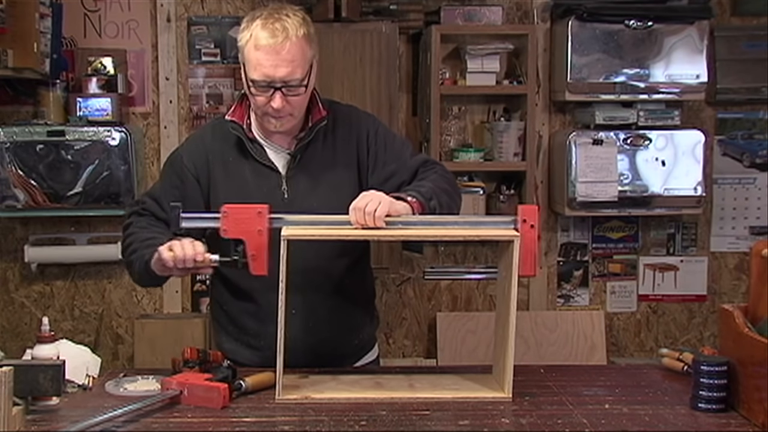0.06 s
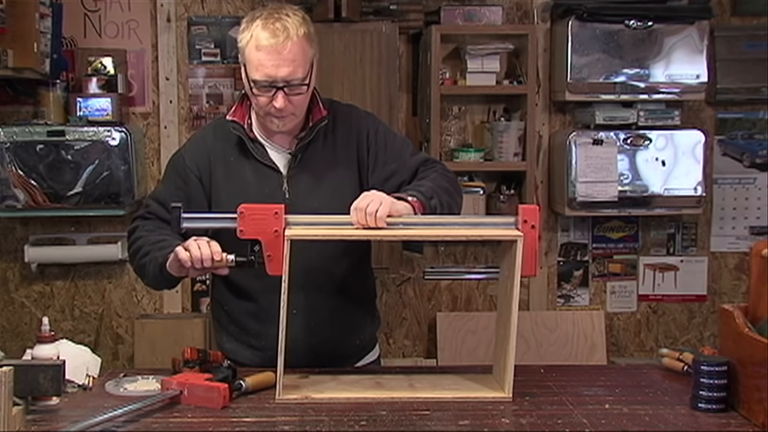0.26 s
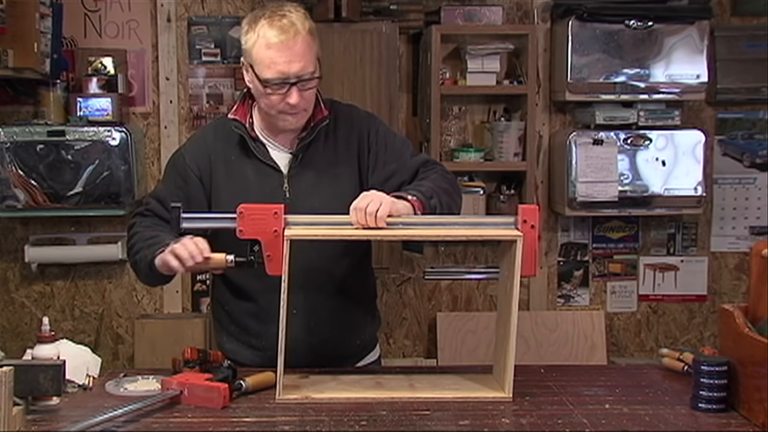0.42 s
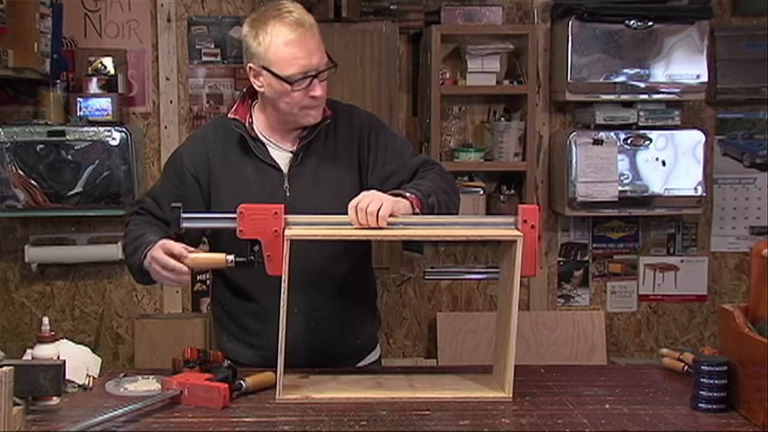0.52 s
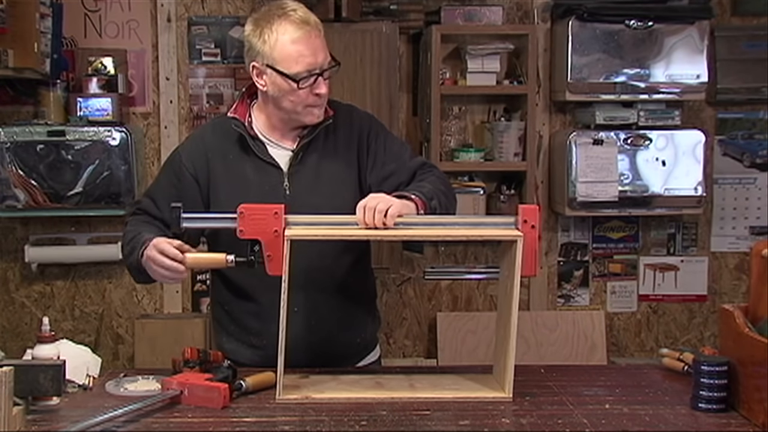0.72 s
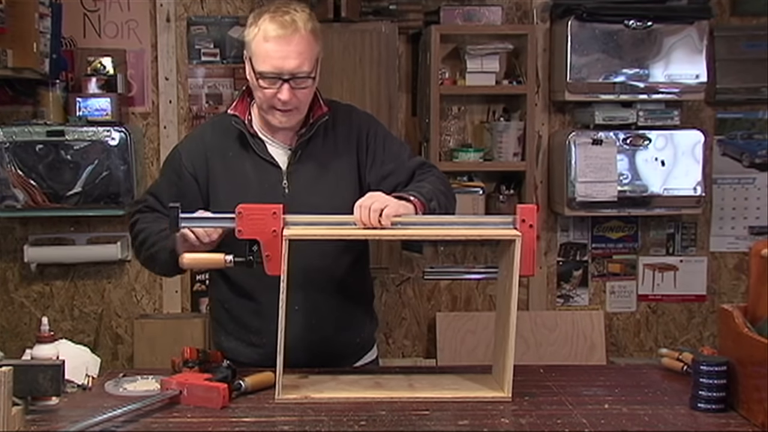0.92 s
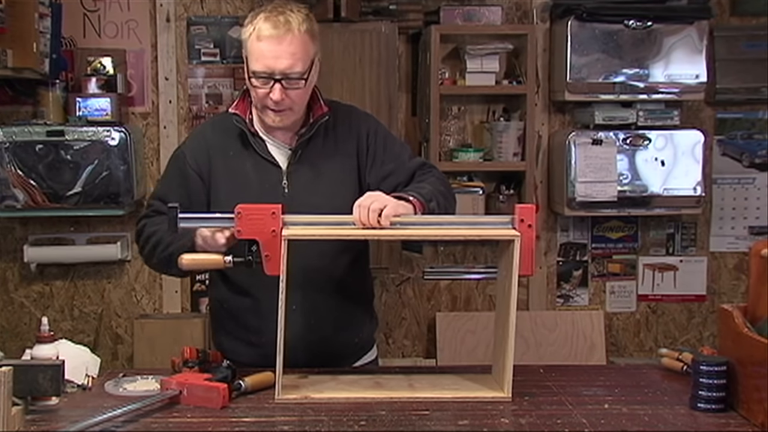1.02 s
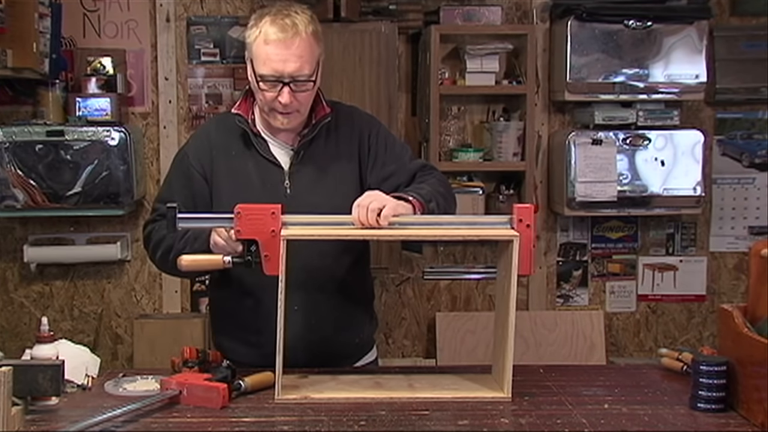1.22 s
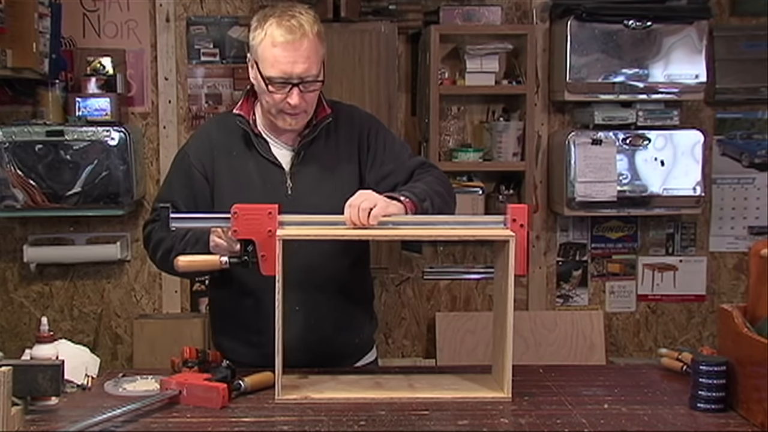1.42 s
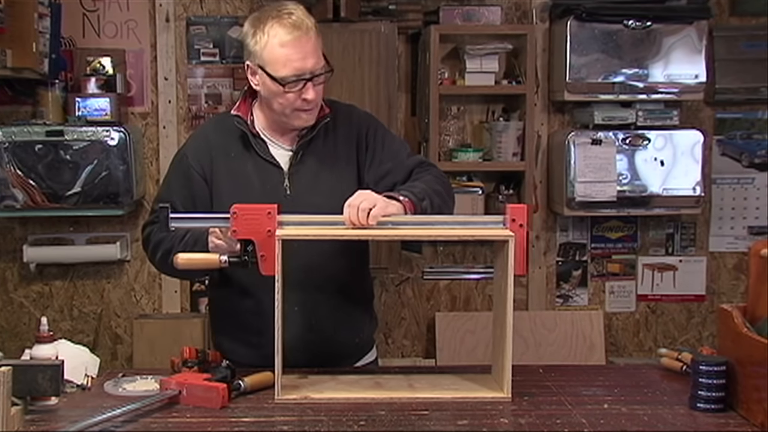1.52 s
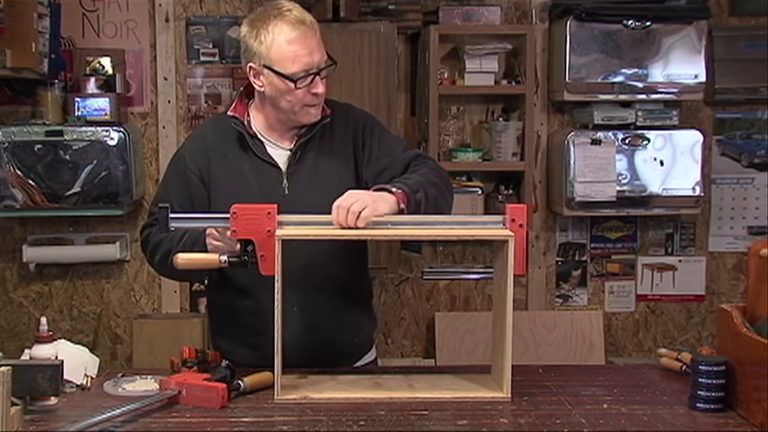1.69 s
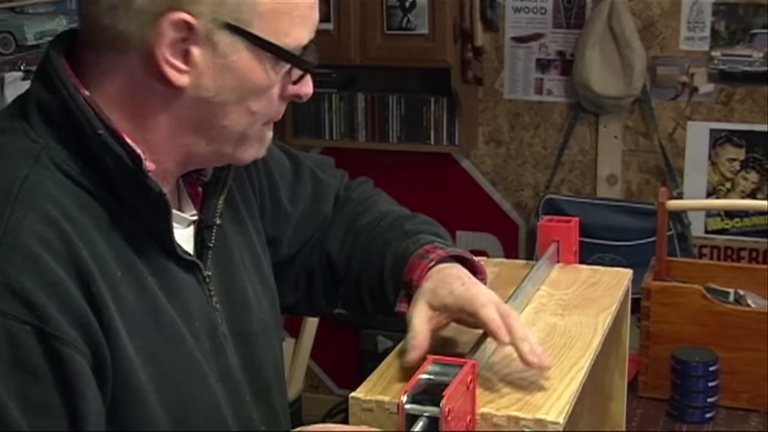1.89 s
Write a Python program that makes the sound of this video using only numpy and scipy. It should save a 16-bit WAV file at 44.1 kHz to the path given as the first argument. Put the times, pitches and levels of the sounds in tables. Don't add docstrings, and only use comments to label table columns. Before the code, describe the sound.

A metal bar clamp jaw scrapes briefly and slams on a hollow wooden box, then faint handle clicks and creaks, a second woody knock and a tiny squeak, close up in a quiet garage workshop.

```python
import sys
import numpy as np
from scipy import signal
from scipy.fft import rfft, irfft, next_fast_len
from scipy.io import wavfile

SR = 44100
rng = np.random.default_rng(int(sys.argv[2]) if len(sys.argv) > 2 else 0)


def wrap_up_sound(samples):
    columns = np.atleast_2d(samples).T
    tamed = np.clip(columns, -1, 1)
    steps = np.round(tamed * 32767).astype(np.int16)
    wavfile.write(sys.argv[1], SR, steps)


def gain_from_db(level_db):
    decades = np.asarray(level_db, float) / 20
    return 10 ** decades


N = 85995

# (frequency [Hz], width [Hz], level [dB])
HANDLE_MODES = [(1557, 51, -1), (1936, 54.8, 1.5), (2360, 103, -7.5), (2980, 70, -0.5), (3400, 110, -15.5),
                (4250, 350, -13)]


def unit(x):
    return x / np.sqrt(np.mean(x ** 2) + 1e-20)


def along(points, hz):
    f, v = np.transpose(points)
    return np.interp(np.log(hz + 1), np.log(f + 1), v)


def filtered(x, response):
    n = x.shape[-1]
    m = next_fast_len(n + 8192)
    return irfft(rfft(x, m) * response(np.fft.rfftfreq(m, 1 / SR)), m)[..., :n]


def band(f, hz, q):
    return 1j * f * hz / q / (hz * hz - f * f + 1j * f * hz / q)


def resonances(modes):
    def response(f):
        return sum((-1) ** k * gain_from_db(db) * 1j * f * width_hz / (hz * hz - f * f + 1j * f * width_hz)
                   for k, (hz, width_hz, db) in enumerate(modes))
    return response


def dying(t60s, channels, length):
    hz, t, z = signal.stft(rng.standard_normal((channels, length)), SR, nperseg=128)
    decay = gain_from_db(-60 * t / along(t60s, hz)[:, None])
    tail = signal.istft(z * decay, SR, nperseg=128)[1][:, :length]
    return tail / np.linalg.norm(tail[0])


def add(out, s, x):
    part = out[round(s * SR):][:len(x)]
    part += x[:len(part)]


def knocks():
    # (time [s], level [dB], most excited modes [Hz])
    blows = [(.005, -41.5, 55.4), (0.059, -42.5, 84), (0.071, -38.5, 863), (.0715, -43.5, 2080),
             (.092, -45.5, 770), (0.237, -37.5, 92), (.30, -42.5, 329), (.085, -42.5, 142),
             (0.212, -17.5, 1400), (.219, -22.5, 666), (0.2166, -26, 200), (0.2194, -27, 1024),
             (0.2227, -23.5, 178.7), (.250, -31, 640), (.258, -40.5, 1105), (.270, -37, 640),
             (0.289, -43, 987), (0.489, -47.5, 494), (.522, -49.5, 338), (0.606, -61.5, 1190),
             (0.611, -48.5, 206.5), (0.861, -50.5, 340), (0.910, -41, 855), (0.9254, -41.5, 340),
             (0.976, -42, 139), (1.073, -46.5, 130.5), (1.093, -51.5, 115.5), (1.127, -54.5, 116),
             (1.148, -49, 118), (1.175, -52.5, 998), (1.348, -45, 243), (1.386, -39, 505),
             (1.345, -49.5, 730), (1.3941, -27, 1730), (1.3975, -17.5, 173), (1.398, -27, 670),
             (1.422, -31, 250), (1.437, -37, 211), (1.582, -52.5, 597), (1.584, -51.5, 290),
             (1.815, -56, 930), (1.831, -48.5, 132.8)]
    # (frequency [Hz], level [dB], t60 [s])
    box_modes = [(61, -4.5, 0.6), (96.2, -6, 0.34), (131.2, -0.5, .11), (175.9, 3.5, .07),
                 (213.2, -6, 0.16), (340, -5, 0.24), (289, -3.5, 0.11), (640, 5.5, 0.065),
                 (766.8, -4, 0.14), (1026.5, -3.5, 0.053), (1143, 0.5, 0.015), (1319, -2, 0.061),
                 (1536, -6.5, 0.052), (1678, -5, 0.053)]
    # (frequency [Hz], t60 [s])
    wood_t60 = [(100, 0.12), (1000, 0.12), (2000, 0.069), (12000, .04)]
    # (time [s], level [dB])
    sways = [(0.058, -48), (0.216, -38.5), (0.502, -60.5), (0.757, -63), (0.903, -51), (.98, -53),
             (1.178, -59), (1.341, -56), (1.398, -39), (1.541, -53.5), (1.682, -61.5)]
    spread_oct, contact_cycles = 0.5, 0.2
    rattle_db, rattle_from_hz = 0.5, 223
    sway_hz, sway_s = 31.8, 0.0089

    out, t = np.zeros(N), np.arange(SR // 3) / SR
    for s, db, spot_hz in blows:
        ring = 0
        for hz, mode_db, t60_s in box_modes:
            off_spot_db = 5.7 * (np.log2(hz / spot_hz) / spread_oct) ** 2
            decay = gain_from_db(mode_db + rng.normal() - 60 * t / t60_s - off_spot_db)
            detune = 1 + rng.normal() / 250
            ring = ring + decay * np.sin(2 * np.pi * hz * detune * t)
        rise = 1 - np.exp(-t * spot_hz / contact_cycles)
        panels = rise * dying(wood_t60, channels=1, length=len(t))[0]
        rattle = filtered(panels, lambda f: band(f, spot_hz, 0.66) ** 3)
        loose = gain_from_db(rattle_db) * spot_hz / (spot_hz + rattle_from_hz)
        add(out, s, gain_from_db(db) * (rise * ring / 2 + loose * rattle / np.abs(rattle).max()))

    sway = 3 * t / sway_s * np.exp(-t / sway_s) * np.sin(2 * np.pi * sway_hz * t)
    for s, db in sways:
        add(out, s, gain_from_db(db) * sway)
    return filtered(out, lambda f: 1 - band(f, 540.7, 8.4))


def clicks():
    # (time [s], peak level [dB], colour
    # [Hz])
    all_clicks = [(0.038, -60, 1944), (0.056, -35, 9500), (0.0717, -28, 4370), (0.074, -41, 5000),
                  (.1123, -62, 3200), (.1432, -48, 2840), (0.1653, -42, 3000), (0.1754, -36.5, 3580),
                  (0.184, -44, 1300), (0.0548, -48.5, 3400), (0.2121, -24, 3700), (0.216, -23, 5400),
                  (0.2166, -17.5, 13400), (0.233, -31.5, 8950), (0.2822, -43.5, 6080), (0.4442, -56.5, 1820),
                  (.488, -75, 6000), (0.4947, -49.5, 3800), (0.5226, -42.5, 1733), (0.5485, -51, 1390),
                  (.604, -59.5, 7860), (0.606, -59, 3020), (.625, -61.5, 14000), (.642, -55.5, 8250),
                  (.688, -63, 4500), (0.7616, -52, 7050), (.788, -60, 4500),
                  (.900, -53.5, 6300), (0.901, -50, 11760), (0.903, -50, 6200), (0.9058, -48, 5200),
            (.908, -49, 6500), (0.9121, -48.5, 2800), (0.9229, -43.5, 2040), (0.905, -44, 11400),
            (0.9273, -45, 5800), (1.068, -66, 3900), (.958, -55.5, 8780), (0.9744, -40.5, 6640),
            (.9745, -38.5, 13600), (0.982, -46, 6400), (0.993, -49, 5700), (0.997, -52, 5530),
            (1.1375, -56, 12990), (1.178, -49, 3110), (1.1823, -51, 11620), (1.216, -60, 3440),
            (1.3427, -41.5, 6100), (1.343, -46.5, 2800), (1.342, -54, 12950), (1.375, -42.5, 4130),
            (1.377, -46, 11250), (1.388, -40, 13000), (1.3934, -31.5, 2700), (1.399, -37, 6900),
            (1.405, -33, 6800), (1.407, -36.5, 14010), (1.4237, -42, 11600), (1.5372, -48, 14400),
            (1.5816, -53.5, 5700), (1.686, -52, 4560), (1.738, -63, 2200), (1.818, -60.5, 5400),
            (1.833, -60, 3000)]
    # (frequency [Hz], level [dB], width [Hz])
    steel_modes = [(3740, -5, 150), (6000, 0, 150), (6500, -5, 120), (9520, 4, 150), (11600, -4, 200),
                   (14700, 2, 250)]
    click_t60_s, growth = 0.016, 0.3
    crack_q = 0.68
    ring_db, ring_oct = 11, 0.12

    out, t = np.zeros(N), np.arange(SR // 8) / SR
    for s, db, colour_hz in all_clicks:
        t60_s = click_t60_s * gain_from_db(growth * (db + 40))
        burst = rng.standard_normal(len(t)) * gain_from_db(-60 * t / t60_s)

        def struck(f):
            response = band(f, colour_hz, crack_q) ** 3
            for hz, mode_db, width_hz in steel_modes:
                off_colour_db = 4 * (np.log2(hz / colour_hz) / ring_oct) ** 2
                response = response + gain_from_db(ring_db + mode_db - off_colour_db) * band(f, hz, hz / width_hz)
            return response

        crack = filtered(burst, struck)
        add(out, s, gain_from_db(db) * crack / np.abs(crack).max())
    return out


def rub(level, modes, broad, broad_db, per_s, spiky_db):
    chance = rng.random((2, N))
    slip_now = chance[0] < per_s / SR
    strength = gain_from_db(-spiky_db * np.log(np.maximum(chance[1], .05)))
    slips = slip_now * strength * rng.standard_normal(N)
    tone = unit(filtered(slips, resonances(modes))) if modes else 0
    hiss = unit(filtered(slips, lambda f: gain_from_db(along(broad, f))))
    s, db = np.transpose(level)
    s = np.r_[s[0] - .004, s, s[-1] + .006]
    db = np.r_[-130, db, -130]
    pressure = gain_from_db(np.interp(np.arange(N) / SR, s, db))
    return pressure * (tone + gain_from_db(broad_db) * hiss)


def snaps():
    # (time [s], peak level [dB])
    let_go = [
        (0.7283, -71),
        (0.738, -62),
        (.7622, -47.5),
        (0.7786, -61.5),
        (.7943, -56.5),
        (0.8127, -56.5),
    ]
    t = np.arange(2000) / SR
    out = np.zeros(N)
    for s, db in let_go:
        push = rng.standard_normal(len(t)) * gain_from_db(-60 * t / .003)
        ring = filtered(push, lambda f: (resonances(HANDLE_MODES)(f) + gain_from_db(-12.5)) * band(f, 2300, 0.67) ** 2)
        ring = ring * gain_from_db(-60 * t / 0.034)
        add(out, s, gain_from_db(db) * ring / np.abs(ring).max())
    return out


def friction():
    # (time [s], level [dB])
    slide = [(.074, -86.5), (.11, -59.5), (.16, -52), (.182, -48.5), (.21, -46)]
    # (frequency [Hz], width [Hz], level [dB])
    bar_modes = [(758, 60, 1.5), (1340, 82, 3.5), (1960, 60, -5), (3146, 110, 3.5), (3880, 84, -5.5),
                 (6500, 60, -5.5)]
    # (frequency [Hz], level [dB])
    scrape = [(200, -3), (600, -3.5), (3300, -9.5), (9000, -19), (16000, -16)]
    # (time [s], level [dB])
    creak = [(.726, -61), (.733, -63), (.739, -62), (.746, -70), (.755, -62), (.772, -67.5), (.785, -64),
             (.80, -72), (.826, -87)]
    # (frequency [Hz], level [dB])
    palm = [(100, -5), (400, 0), (1500, -3.5), (3000, -10), (15000, -27)]
    # (time [s], level [dB])
    bite = [
        (1.848, -72),
        (1.855, -69),
        (1.862, -67),
    ]
    # (frequency [Hz], width [Hz], level [dB])
    tip_modes = [(4200, 150, -7), (6030, 60, 0)]
    # (time [s], level [dB])
    squeak = [(1.745, -79), (1.788, -77.5), (1.80, -67.5), (1.825, -69), (1.833, -84), (1.842, -71.5),
              (1.863, -66.5)]
    # (frequency [Hz], width [Hz], level [dB])
    screw_modes = [(850, 120, -3), (1460, 50, 6), (4130, 130, 0), (5900, 90, -4), (10000, 180, -12)]
    # (time [s], level [dB])
    thread = [(1.735, -76), (1.80, -70), (1.822, -73), (1.83, -79), (1.94, -82.5)]
    # (time [s], level [dB])
    rustle = [(.54, -97), (.61, -66.5), (.68, -90.5), (.84, -80.5), (.87, -75), (.93, -58.5), (1.04, -79),
              (1.13, -77), (1.185, -62.5), (1.23, -97)]
    dry_thread = [(300, -0.5), (8000, 0), (16000, -2)]  # (frequency [Hz], level [dB])

    jaw = rub(slide, bar_modes, scrape, broad_db=1.5, per_s=3500, spiky_db=3)
    handle = rub(creak, HANDLE_MODES, palm, broad_db=-14.5, per_s=1500, spiky_db=2.0) + snaps()
    screw = (rub(bite, tip_modes, scrape, broad_db=-22, per_s=12000, spiky_db=0)
             + rub(squeak, screw_modes, scrape, broad_db=-14, per_s=4000, spiky_db=2)
             + rub(thread, [], dry_thread, broad_db=0.0, per_s=18000, spiky_db=5.5))
    hand = rub(rustle, [], palm, broad_db=0, per_s=6000, spiky_db=4)
    return jaw + handle + screw + hand


def pair(a, b):
    likeness = .9997
    u = np.arccos(np.clip(likeness, 0, 1)) / 2
    return np.array([np.cos(u) * a + np.sin(u) * b, np.cos(u) * a - np.sin(u) * b])


def room(x):
    # (frequency [Hz], t60 [s])
    garage_t60 = [(100, 0.3), (600, 0.41), (1200, 0.37), (2200, 0.3), (5000, 0.32), (14000, 0.11)]
    tail = dying(garage_t60, channels=2, length=SR // 2)
    return pair(*signal.fftconvolve(np.pad(x, (200, 0))[None], tail, axes=1)[:, :N])


def air():
    # (frequency [Hz], level [dB])
    air_colour = [(15, -15), (30, -1), (100, 0), (200, -8), (400, -7.5), (1370, -17), (6000, -32.5),
                  (13500, -31), (15500, -53)]
    noise = filtered(rng.standard_normal((2, N)), lambda f: gain_from_db(along(air_colour, f)))
    return gain_from_db(-70) * pair(*unit(noise))


def scene():
    wet_db, rub_wet_db = -13.5, -6.5
    hits, rubs = knocks() + clicks(), friction()
    heard = filtered(hits + gain_from_db(rub_wet_db) * rubs, lambda f: 1j * f / (70 + 1j * f))
    return hits + rubs + gain_from_db(wet_db) * room(heard) + air()


def low_pass(x):
    return signal.sosfilt(signal.butter(12, 16530, fs=SR, output="sos"), x)


def record(dry):
    # (frequency [Hz], phase [rad])
    lead = [(200, -.02), (500, -.015), (1000, -.07), (2000, -.26), (4000, -.56), (8000, -1.15),
            (12000, -1.55), (16000, -2.2)]
    top_hz, fade_hz = 15750, 600
    side = np.array([[1], [-1]])

    def response(f):
        limit = np.cos(np.pi / 2 * np.clip((f - top_hz) / fade_hz, 0, 1)) ** 2
        return limit * np.exp(.5j * along(lead, f) * side)

    return low_pass(filtered(dry, response))


dry = scene()
out = record(dry)
wrap_up_sound(out)
```